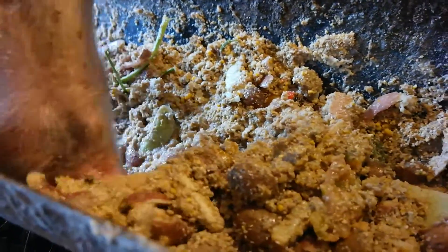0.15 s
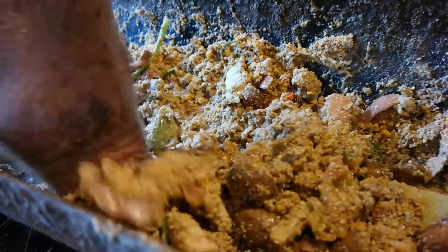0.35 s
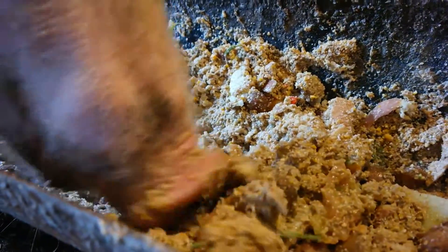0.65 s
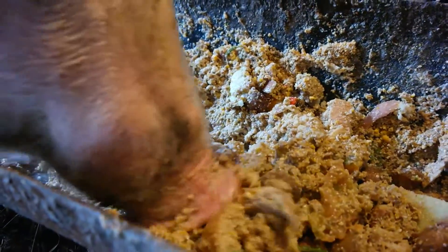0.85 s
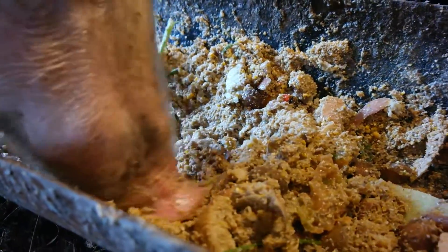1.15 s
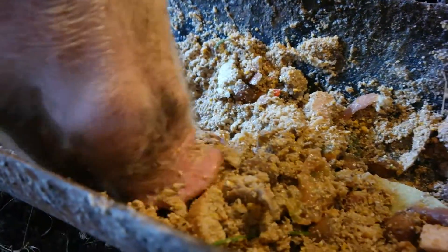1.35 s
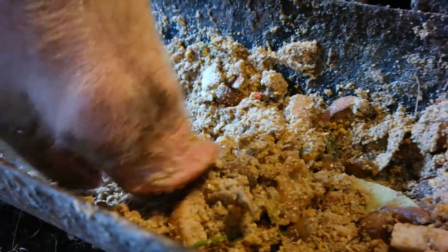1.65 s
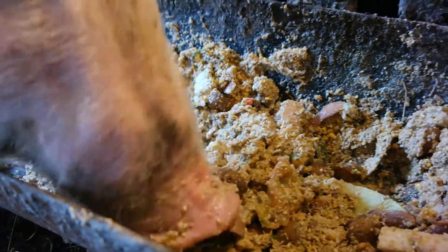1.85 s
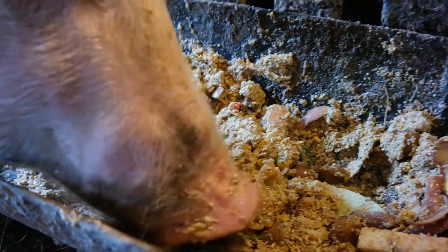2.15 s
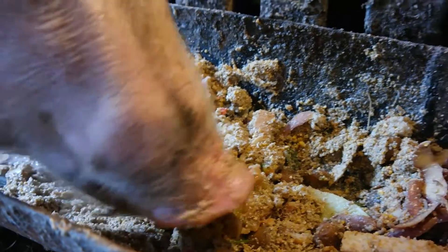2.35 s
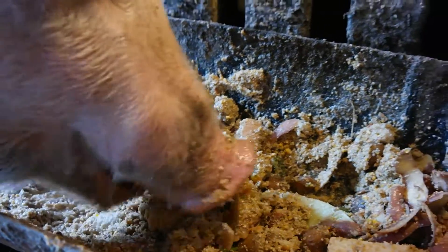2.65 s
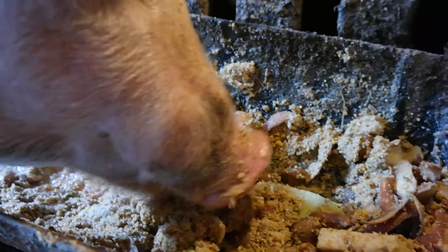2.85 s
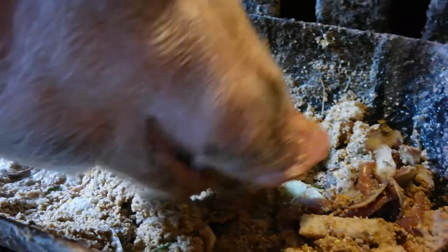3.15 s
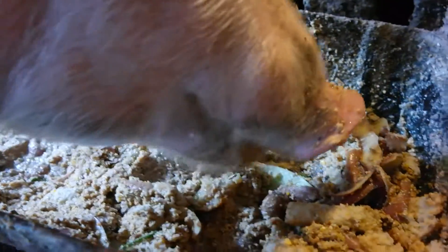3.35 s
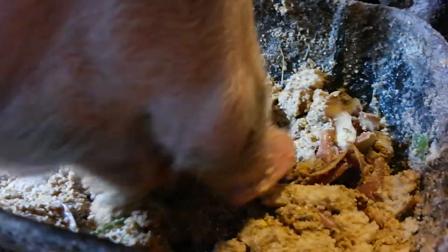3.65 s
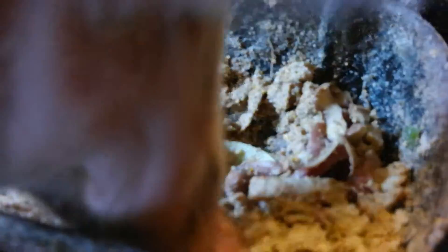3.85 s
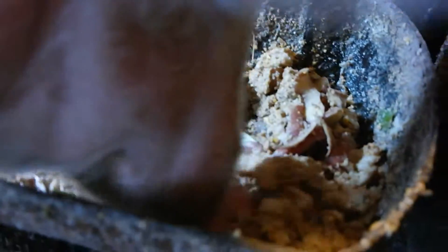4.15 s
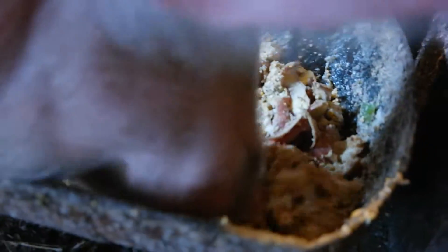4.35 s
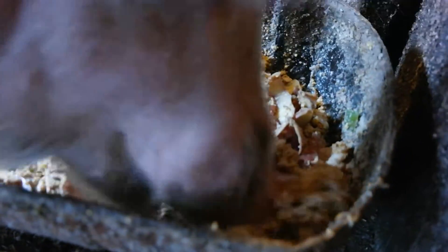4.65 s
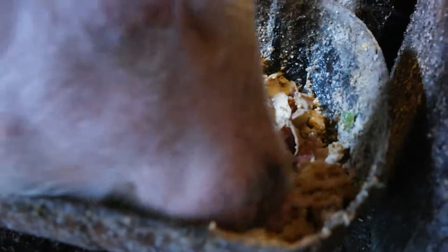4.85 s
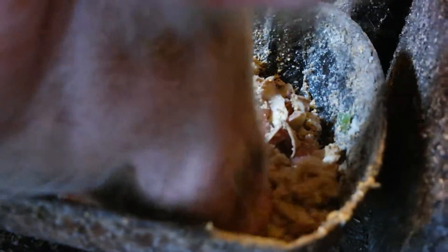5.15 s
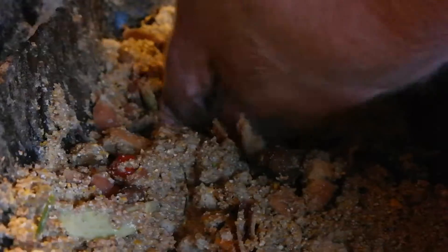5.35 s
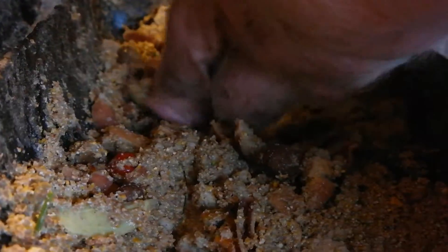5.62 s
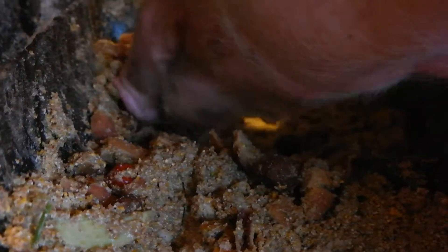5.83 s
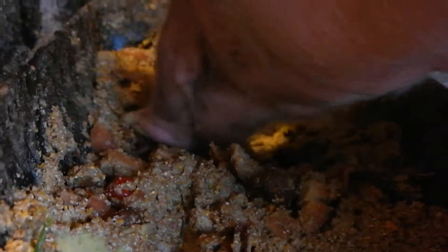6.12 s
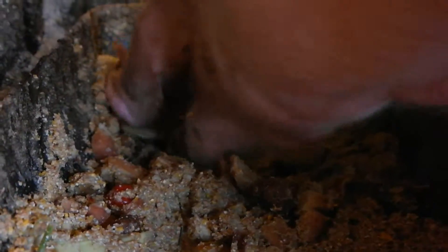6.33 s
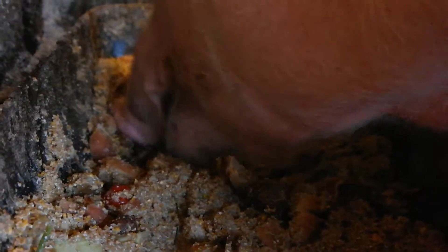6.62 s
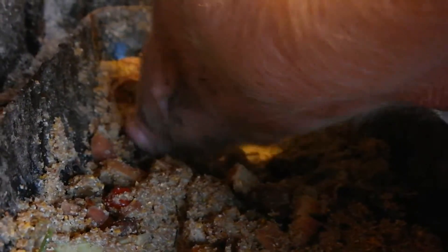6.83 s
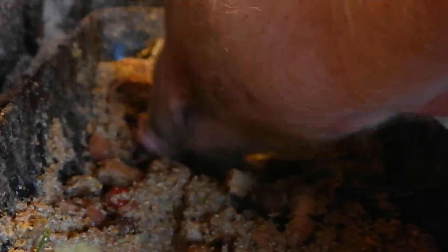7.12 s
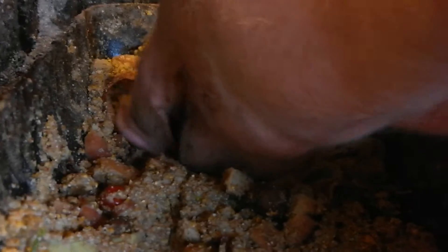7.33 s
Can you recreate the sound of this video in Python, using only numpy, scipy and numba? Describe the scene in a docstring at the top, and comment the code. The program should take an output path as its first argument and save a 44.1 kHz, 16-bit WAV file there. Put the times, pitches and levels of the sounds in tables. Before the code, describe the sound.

A pig eats wet mash very close up: constant squelching, smacking lips, popping air pockets, crust cracks and one snorting nose blow.

```python
"""A pig roots in wet mash in a trough, its snout a hand's width from a phone.
Air pockets pop as noise-struck resonances with wet tails; lips smack, crust cracks, the snout bumps.
Mash squelches as resonant noise opened by tiny bursts and by each bite, among bubbles rising in pitch.
The snout blows one long rush; low noise resonances make the grunts, the trough's hum and the yard's rumble."""
import sys
import numpy as np
from scipy import signal
from scipy.io import wavfile
from scipy.ndimage import uniform_filter1d
from numba import njit

SR = 44100
rng = np.random.default_rng(int(sys.argv[2]) if len(sys.argv) > 2 else 0)


def bounce(signal):
    """Save signal as a 16-bit WAV file at the path given by the first command-line argument."""
    frames = np.transpose(np.atleast_2d(signal))
    limited = np.clip(frames, -1, 1)
    pcm = np.round(limited * 32767).astype(np.int16)
    wavfile.write(sys.argv[1], SR, pcm)


N = 329865

# resonances of the mouth: (centre [Hz], nominal width [Hz], level [dB])
MOUTH = [(411, 140, 1), (742, 120, 1.5), (1013, 43, -6.5), (1286, 190, -3), (1549, 83, -2)]
# resonances at the lips: (centre [Hz], nominal width [Hz], level [dB])
LIPS = [(2035, 196, -6), (2940, 590, -2), (3830, 140, -13), (4450, 470, -11.5)]
BLOW_START_S, BLOW_END_S = 1.385, 1.74


def undb(db):
    """Decibels to amplitude factor."""
    return 10 ** (np.asarray(db) / 20)


def unit(x):
    """Scale to RMS 1."""
    return x / np.sqrt(np.mean(x ** 2))


def band(x, hz, width_hz):
    """One resonance, gain 1 at the centre."""
    b, a = signal.iirpeak(min(hz, 0.4 * SR), hz / min(width_hz, SR / 4), SR)
    return signal.lfilter(b, a, x)


@njit
def moving(x, g, k):
    """A steep resonance whose centre moves: each row runs twice through a state-variable band-pass."""
    y = x.copy()
    for turn in range(4):
        row, b, l = y[turn % 2], 0., 0.
        for i in range(len(g)):
            v = (b + g[i] * (row[i] - l)) / (1 + g[i] * (g[i] + k))
            b, l, row[i] = 2 * v - b, l + 2 * g[i] * v, k * v
    return y


def ports(mid_side, hz):
    """Left and right from a mid and a side sound; the microphone ports differ most in the treble."""
    # stereo width: (frequency [Hz], side minus mid [dB])
    width = [(60, -5.5), (110, -23), (200, -12.5), (380, -16), (700, -12.5), (1290, -8), (2380, -5.5),
             (4400, -0.5), (8120, -0.5), (15000, -0.5)]
    at_hz, side_db = np.transpose(width)
    side = undb(np.interp(np.log(hz), np.log(at_hz), side_db)) * mid_side[1]
    return np.array([mid_side[0] + side, mid_side[0] - side])


def walk(rate_hz):
    """Random levels 1 / rate_hz apart, never far above the mean, joined by straight lines."""
    steps = np.arange(0, N / SR * rate_hz + 1)
    levels = np.clip(rng.standard_normal(len(steps)), -2.5, 1.6)
    return np.interp(np.arange(N) * rate_hz / SR, steps, levels)


def crackle(rate_hz, spread_db, fade_s):
    """Envelope of random tiny bursts: soft start, quick fade, sizes capped."""
    when, size = rng.random((int(rate_hz * N / SR), 2)).T
    starts = np.zeros(N)
    starts[(when * N).astype(int)] = undb(np.minimum(-spread_db * np.log(1 - size), 2 * spread_db))
    bursts = signal.lfilter([1], [1, -np.exp(-1 / (fade_s * SR))], starts)
    return unit(uniform_filter1d(bursts, size=130))


def texture(modes, shared, lumpy, own_rate_hz, own_share, flicker_db, drift):
    """Noise in each wandering resonance, opened by a shared gate and its own bursts, ticked by grains."""
    grit, grit_per_s = 4.4, 220  # grain size over the hiss, scaled by lumpy; grain rate
    out = 0
    for hz, width_hz, db in modes:
        gate = shared + lumpy * own_share * crackle(own_rate_hz, 4.5, 4.8 / hz + 0.0023)
        flicker = undb(flicker_db * walk(18))
        noise = gate * flicker * rng.standard_normal((2, N))
        noise = noise * (1 + lumpy * grit * (rng.random(N) < grit_per_s / SR))
        centre = np.tan(np.pi * hz / SR * (1 + drift * walk(12)))
        ringing = unit(moving(noise, centre, 2.24 * width_hz / hz))
        out = out + undb(db) * ports(ringing, hz)
    return unit(out)


def low_texture(modes):
    """Low resonances under noise, with sparse soft bursts and little drift."""
    return texture(modes, 0.5, 0.63, own_rate_hz=5.8, own_share=0.47, flicker_db=0.5, drift=0.016)


def yard():
    """Far-off yard: one low noise resonance at a fixed faint level."""
    # rumble resonance: (centre [Hz], nominal width [Hz], level [dB])
    modes = [(48.3, 38, 6)]
    return undb(-57.5) * low_texture(modes)


def trough_hum():
    """The trough hums under the snout: one low resonance whose level follows a curve."""
    # trough resonance: (centre [Hz], nominal width [Hz], level [dB])
    modes = [(93.5, 22, 0)]
    # hum curve: (time [s], level [dB])
    curve = [(0.0, -62), (0.02, -53), (1.35, -61), (1.44, -39), (1.69, -58.5), (4.4, -60), (4.44, -36),
             (4.71, -59), (5.02, -46.5), (5.19, -61), (5.35, -35), (5.39, -53.5), (6.88, -55), (7.48, -59)]
    s, db = np.transpose(curve)
    return undb(np.interp(np.arange(N) / SR, s, db)) * low_texture(modes)


def grunts():
    """Chest resonances under noise; each grunt swells and dies away smoothly over a faint throat."""
    # chest resonances: (centre [Hz], nominal width [Hz], level [dB])
    chest = [(146.4, 31.6, -2), (222.5, 43, -1.5), (278, 230, -5.5)]
    # low grunts: (middle [s], length [s], gain added to the faint throat's [dB])
    calls = [(1.596, 0.99, -44), (2.502, 0.38, -41.5), (3.457, 0.61, -39), (7.087, 0.78, -48)]
    t = np.arange(N) / SR
    gain = np.full(N, undb(-53))  # between grunts
    for middle_s, length_s, db in calls:
        gain += undb(db) * np.exp(-(4 * (t - middle_s) / length_s) ** 2)
    return gain * low_texture(chest)


def swell(since_s, length_s, top_db, sag_db_per_s):
    """Gains of deep squelch, thin squelch and spit for one effort: it rises, sags and lets go."""
    rise_s, fall_s = 0.016, 0.056
    since_s = np.maximum(since_s, 0)
    shape = np.minimum(since_s / rise_s, 1) * np.exp(-np.maximum(since_s - length_s, 0) / fall_s)
    return shape * undb(np.array(top_db)[:, None] - np.outer(sag_db_per_s, since_s))


def jaw():
    """The loudest effort of the moment, bite or blow, sets the gains of deep squelch, thin squelch and spit."""
    # jaw closings: (start [s], length [s], deep squelch [dB], thin above deep [dB], spit above deep [dB])
    bites = [(-0.03, 0.13, -36.5, -2, -0.5), (0.166, 0.2, -40, -2.5, 1), (0.397, 0.047, -38, -8, 1),
             (0.526, 0.11, -46, -0.5, 2.5), (0.647, 0.097, -37, 1, 2), (0.78, 0.19, -43, -11, -4.5),
             (0.949, 0.21, -41.5, 0, 3.5), (1.175, 0.24, -39.5, -4, -2), (1.718, 0.15, -35.5, -6, 0.5),
             (1.916, 0.11, -46.5, -3, -13), (2.096, 0.12, -58, 11, 16), (2.349, 0.38, -42.5, 0, 3),
             (2.645, 0.28, -40, 0, 1.5), (2.976, 0.11, -41, 0, 4.5), (3.169, 0.2, -42.5, -3, 4.5),
             (3.403, 0.19, -40, -0.5, -0.5), (3.642, 0.28, -42, -1, -1.5), (3.924, 0.59, -40.5, -2, -0.5),
             (4.294, .1, -46, -1.5, -1.5), (4.404, 0.21, -44.5, -1.5, 3.5),
             (4.636, 0.34, -41.5, -3.5, -2.5), (4.95, 0.18, -50, -3, 2), (5.227, 0.12, -44, -3, -0.5),
             (5.323, 0.015, -45, -2, 13), (5.395, 0.16, -38.5, -4, -3.5), (5.656, 0.2, -44.5, 0.5, 4),
             (5.877, 0.15, -41, -6, 0), (5.967, 0.31, -40, -2.5, 3.5), (6.304, 0.19, -39.5, -0.5, 4),
             (6.522, 0.11, -41.5, -3, -2), (6.666, 0.097, -41.5, 4, 7), (6.82, 0.18, -34.5, -2.5, -4.5),
             (7.031, 0.14, -35.5, -2.5, -1), (7.23, 0.1, -45, -6, -2.5), (7.382, .2, -41.5, 2.5, 6.5)]
    # each triple: deep, thin, spit
    rest_db, sag_db_per_s = (-55, -53, -50.5), (10.5, 11, 3)
    blow_db, blow_sag_db_per_s = (-27.5, -27.5, -27), (12, 24, 46)
    t = np.arange(0, N / SR, 1 / 1000)
    blow = swell(t - BLOW_START_S, BLOW_END_S - BLOW_START_S, blow_db, blow_sag_db_per_s)
    out = np.maximum(undb(rest_db)[:, None], blow)
    dip_s, dip_half_s, dip_db = 1.59, 0.027, -4  # the rush falters once
    out = out * undb(dip_db * np.exp(-((t - dip_s) / dip_half_s) ** 2))
    for start_s, length_s, db, thin_db, spit_db in bites:
        bite = swell(t - start_s, length_s, (db, db + thin_db, db + spit_db), sag_db_per_s)
        out = np.maximum(out, bite)
    return [np.interp(np.arange(N) / SR, t, gain) for gain in out]


def bubbles(count, low_hz, high_hz, cycles):
    """Small bubbles in the mash: a few quick decaying cycles each, rising in pitch."""
    out = np.zeros((2, N + SR))
    for when, pitch, size, turn in rng.random((count, 4)):
        hz = low_hz * (high_hz / low_hz) ** pitch
        turns = np.arange(int(5 * cycles * SR / hz)) * hz / SR
        phase = 2 * np.pi * (turns * (1 + 0.039 * turns / cycles) + np.array([[0], [turn]]))
        loudness = np.maximum(1 - size, 0.1) ** -0.3
        tone = loudness * np.minimum(turns, 1) * np.exp(-turns / cycles) * np.sin(phase)
        i = int(when * N)
        out[:, i:i + len(turns)] += ports(tone, hz)
    return unit(out[:, :N])


def squelch():
    """Wet mash yields under the jaw, one burst train in mouth, lips and spit; the blow rushes through the nose."""
    # resonances of the nostrils: (centre [Hz], nominal width [Hz], level [dB])
    nose = [(427, 170, -11.5), (697, 160, -17.5), (1375, 270, -9), (1800, 350, -20.5), (2980, 260, -21)]
    # resonances of the spit: (centre [Hz], nominal width [Hz], level [dB])
    spit_modes = [(5650, 3200, 0), (9000, 4900, -0.5), (12200, 4100, -18), (14400, 5000, 3)]
    t = np.arange(N) / SR
    blowing = uniform_filter1d(1. * ((t > BLOW_START_S) & (t < BLOW_END_S)), size=700)
    lumpy = 1 - 0.65 * blowing  # the rush is more even
    bursts = 1 - 0.62 * lumpy + lumpy * 0.36 * crackle(90, 4.8, 0.0045)
    deep = texture(MOUTH, bursts, 0.49, own_rate_hz=23, own_share=0.29, flicker_db=3.5, drift=0.079)
    deep = deep + undb(-11.0) * bubbles(count=250, low_hz=382.4, high_hz=1598, cycles=5.9)
    rush = texture(nose, 0.9, 0.32, own_rate_hz=60, own_share=0.8, flicker_db=3.5, drift=0.043)
    thin = texture(LIPS, bursts, lumpy, own_rate_hz=44, own_share=0.35, flicker_db=4.0, drift=0.049)
    thin = thin + lumpy * undb(-9.0) * bubbles(count=300, low_hz=1695, high_hz=6330, cycles=16.2)
    spit = texture(spit_modes, bursts, lumpy, own_rate_hz=31, own_share=0.11, flicker_db=0.0, drift=0.0093)
    deep_gain, thin_gain, spit_gain = jaw()
    deep_or_rush = (1 - blowing) * deep + blowing * rush
    return deep_gain * deep_or_rush + thin_gain * thin + spit_gain * spit


def add(rings, splashes, s, peak_db, hz, fade_s, splash_db, tail_db, sharp, rise_s, tail_s, burst):
    """A click and a puff of noise ring a resonance; a quicker broad splash trails off in drips."""
    glide = 0.081  # pitch slides by up to about this fraction, up or down
    drip_db, drip_s = 6.5, 0.00299  # unevenness and spacing of the drips
    sing_width_hz = 170  # wet walls widen the singing tail's resonance
    t = np.arange(SR // 10) / SR
    start = (1 - np.exp(-t / rise_s)) ** 2 * (1 - t / t[-1])
    puff = start * (np.exp(-t / fade_s) + 1e-9)
    snap = start * np.exp(-t / (0.5 * fade_s))
    drips = np.interp(t / drip_s, np.arange(100), rng.standard_normal(100))
    tail = undb(tail_db + drip_db * np.minimum(drips, 0.6)) * start * np.exp(-t / tail_s)
    noise = rng.standard_normal((2, len(t)))
    side, slide = rng.uniform(-1.01, 1, size=2)
    click = np.zeros_like(noise)
    click[:, int(2 * rise_s * SR)] = burst * np.array([1, side])
    ring = band(band(puff * noise + click, hz, hz / sharp), hz, hz / sharp)
    sing_hz = np.minimum(hz * (1 + glide * slide * np.minimum(t / tail_s, 1)), 0.4 * SR)
    sing_in = 0.72 * tail * noise + 1.06 * click
    ring = ring + moving(sing_in, np.tan(np.pi * sing_hz / SR), sing_width_hz / hz + 1 / (4.8 * sharp))
    splash = band((snap + 0.5 * tail) * noise + 0.23 * click, hz, 2.15 * hz)
    i = int(s * SR)
    for out, sound, db in ((rings, ring, peak_db), (splashes, splash, peak_db + splash_db)):
        level = sound / np.abs(sound).max(axis=1, keepdims=True)
        part = undb(db) * ports(level, hz)[:, :N - i]
        out[:, i:i + part.shape[1]] += part


def bumps():
    """Snout bumps and gulps: soft, low, barely resonant thuds with no click."""
    # thuds: (time [s], ring peak [dB], centre [Hz], puff fade [s])
    rows = [(0.426, -34, 144, 0.038), (1.43, -14.5, 172, 0.0091), (1.447, -29, 214, 0.013),
            (2.365, -42, 215, 0.0078), (2.771, -34, 142, 0.0058), (2.907, -38, 94.2, 0.0042),
            (3.782, -30, 212, 0.0055), (4.164, -29.5, 216, 0.0045), (4.424, -27, 157, 0.0085),
            (4.468, -43, 101, 0.022), (4.763, -35, 146, 0.0072), (4.934, -38, 93, 0.014),
            (4.995, -37, 101, 0.0043), (5.311, -34, 168, 0.004), (5.538, -29, 248, 0.025),
            (6.449, -25, 325, 0.21), (6.836, -29, 112, 0.0049)]
    out = np.full((2, N), 1e-12)
    for row in rows:
        add(out, out, *row, -6, -14, sharp=0.8, rise_s=0.0038, tail_s=0.044, burst=0)
    return out


def cracks():
    """Hard bits of crust snap between the teeth: a very sudden start and a strong click."""
    # snaps: (time [s], splash peak [dB], centre [Hz], puff fade [s], ring above the splash [dB])
    rows = [(0.6629, -6.5, 4190, 0.0017, -7.5), (2.6051, -8, 5320, 0.0047, -11),
            (3.0739, -19, 14400, 0.003, -7), (3.1642, -8.5, 15000, 0.0045, -6),
            (3.287, -9, 13600, 0.0036, -18), (5.2979, -26, 5310, 0.0027, -6),
            (5.3571, -1, 15100, 0.0032, 4), (5.438, -16, 11400, 0.003, 1),
            (6.4537, -5.5, 14400, 0.0068, -9), (6.8406, -4.5, 15000, 0.0047, -7)]
    out = np.full((2, N), 1e-12)
    for s, db, hz, fade_s, ring_db in rows:
        add(out, out, s, db + ring_db, hz, fade_s, -ring_db, -24,
            sharp=4.0, rise_s=0.00022, tail_s=0.036, burst=5.9)
    return out


def smacks():
    """Lips and tongue peel apart: a softer start, a weak click and a bright splash."""
    # peels: (time [s], splash peak [dB], centre [Hz], puff fade [s], ring above the splash [dB])
    rows = [(0.0903, -25, 14500, 0.0016, -7), (0.3045, -31, 6640, 0.0015, 8),
            (0.4345, -12.5, 13700, 0.0015, 0), (0.779, -26, 15400, 0.0022, 3),
            (1.0103, -17.5, 7800, 0.00053, -2), (1.1255, -22.5, 5260, 0.0018, -7),
            (1.3888, -15, 7450, 0.0023, -9), (1.764, -18, 14000, 0.00072, -14),
            (1.8675, -12, 13900, 0.002, -7), (2.315, -28, 6660, 0.0013, -10),
            (2.496, -31, 6440, 0.0022, -2), (2.662, -20, 7000, 0.0015, -17),
            (2.754, -13.5, 14000, 0.0026, -4), (2.785, -15.5, 14300, 0.002, -15),
            (3.006, -27.5, 6650, 0.0013, -0.5), (3.1487, -27, 11300, 0.0018, -13),
            (3.255, -15.5, 13100, 0.0016, 0.5), (3.324, -28, 13900, 0.002, -1),
            (3.6055, -23.5, 11700, 0.0024, -4), (3.665, -24, 14700, 0.0018, -10),
            (3.7212, -30, 5600, 0.002, 3), (3.7908, -25, 15000, 0.0016, -5),
            (3.807, -21.5, 11700, 0.0027, -7), (4.7736, -27.5, 6580, 0.001, -13),
            (5.109, -32, 7200, 0.0028, -14), (5.1603, -31.5, 5270, 0.0019, -14),
            (5.316, -26, 13100, 0.0011, -10), (5.4282, -14.5, 14200, 0.0027, -5),
            (5.5467, -24.5, 9000, 0.0015, -0.5), (5.6555, -36, 11500, 0.002, 1),
            (6.02, -27, 5600, 0.0021, -1), (6.086, -18, 14000, 0.0029, -7),
            (6.3124, -23, 11300, 0.00085, -22), (6.3609, -24, 14100, 0.0038, 0),
            (6.406, -17, 5240, 0.0047, -11), (6.697, -15, 7850, 0.001, -7), (6.772, -29, 14600, 0.0025, 7),
            (7.0556, -8.5, 9400, 0.0014, -9), (7.088, -11.5, 13000, 0.0041, -13),
            (7.1284, -16.5, 5530, 0.0028, -11), (7.152, -21, 13900, 0.0035, -7)]
    out = np.full((2, N), 1e-12)
    for s, db, hz, fade_s, ring_db in rows:
        add(out, out, s, db + ring_db, hz, fade_s, -ring_db, -20,
            sharp=5.6, rise_s=0.0014, tail_s=0.025, burst=0.88)
    return out


def pops():
    """Air pockets burst and ring their cavities; the splash takes on the resonances of mouth and lips."""
    # bursts: (time [s], ring peak [dB], cavity [Hz],
    #          splash above the ring ahead of the mouth [dB], wet tail drive [dB])
    rows = [(0.023, -23, 1090, -2, -9), (0.07, -29, 1100, -11, -15), (0.206, -23.5, 780, -4, -4.5),
            (0.272, -25.5, 1190, 1, -7), (0.275, -22.5, 3700, -12, -14), (0.289, -22.5, 3680, -7, -2),
            (0.304, -21.5, 3320, 7.5, 1), (0.328, -22, 1200, 5.5, 0), (0.388, -36, 4100, 10, 6),
            (0.418, -28.5, 2100, 6, -1), (0.436, -25, 495, 5.5, 1), (0.458, -26.5, 2020, -21, 1),
            (0.558, -23.5, 2000, -28, -5), (0.591, -31, 1200, -15, -6), (0.662, -5.5, 4220, 2, -14),
            (0.743, -28, 2860, 9, 12), (0.772, -26.5, 1210, -18, 10), (0.827, -29, 955, -9, -13),
            (0.898, -23.5, 925, -16, 0), (0.918, -37.5, 2170, 9, -8), (0.966, -22, 1250, -18, 0),
            (0.98, -28, 3600, -12, -3), (1.011, -32, 2010, 16, 5), (1.042, -21, 1160, 4.5, -5),
            (1.083, -31, 790, -2, -2), (1.115, -15, 2880, -3.5, 0), (1.119, -24.5, 1230, -6, 9),
            (1.127, -15, 2300, -12, -6.5), (1.203, -28.5, 630, -15, 14), (1.243, -29, 2120, 0, -1),
            (1.275, -34, 644, -29, 2), (1.332, -24, 1253, -13, -3), (1.387, -24.5, 1360, 10, -4),
            (1.742, -24, 3100, 4, -9), (1.776, -15.5, 1195, 4.5, -7), (1.87, -24, 680, 4.5, -4.5),
            (2.004, -27, 1140, -28, -4), (2.126, -29.5, 2560, 5, -16), (2.181, -37, 2690, 12, -2.5),
            (2.218, -31, 1350, -9, -1), (2.329, -18, 2250, -4, -11), (2.454, -29, 2790, 7.5, -4.5),
            (2.509, -33.5, 1310, 13.5, 4), (2.526, -27, 4200, 10.5, -2), (2.661, -31, 1320, 12, -7),
            (2.666, -22, 3470, -1, -13), (2.714, -30, 2450, -4, 3), (2.755, -32.5, 715, 11, 5),
            (2.757, -22.5, 2880, 5.5, -3), (2.82, -31, 2720, 5, -9), (2.847, -36, 2520, 8, -4),
            (4.185, -24, 1640, -2, 3.5), (3.018, -19.5, 2200, -11, 1), (3.046, -21.5, 2900, -1.5, -8.5),
            (3.164, -19.5, 4870, 6, -14), (3.212, -25, 1990, -5, 2), (3.254, -26.5, 2170, 10, -5),
            (3.286, -31, 3130, 9, -2), (3.42, -32, 2650, 8, 2), (3.444, -32, 1630, 8, -7),
            (3.453, -28, 2000, 0, -10), (3.5, -26, 3030, -3, -7), (3.554, -23, 1860, -10, -6),
            (3.564, -29, 2620, 4, -21), (3.606, -21, 2780, -0.5, -31), (3.674, -27, 2010, -5, -14),
            (3.721, -23.5, 2880, -8, -14), (3.728, -23.5, 2600, 6, -21), (3.771, -15, 1960, -8, -12),
            (3.807, -27, 1790, 7, 4), (3.922, -24, 760, -10, -19), (3.989, -31, 2900, -2, 7),
            (4.03, -28.5, 1180, 3, 0), (4.071, -17.5, 2930, -1, -4.5), (4.11, -21, 847, 6.5, -2),
            (4.17, -23.5, 684, 8.5, -12), (4.363, -37, 2920, -9, 5), (4.434, -18, 1640, -13, 0),
            (4.435, -21, 2980, -5, -13), (4.44, -21.5, 1150, -18, -4), (4.509, -29, 3600, 2.5, 2),
            (4.531, -30, 2640, 0, -1), (4.546, -32, 2680, 6.5, 3), (4.564, -24.5, 860, -3, 1),
            (4.66, -30, 2940, -6, -5), (4.66, -32.5, 1560, -11, 7), (4.772, -28, 2800, -3, -8),
            (4.811, -17, 1850, -10, -5.5), (5.233, -30, 2700, 5, -8), (5.298, -33.5, 1560, 8, -11),
            (5.338, -33.5, 3500, 16, -14), (5.357, -26, 2020, 8, -33), (5.418, -36, 785, 9, -10),
            (5.444, -27.5, 1580, 4, -3), (5.547, -21.5, 1440, -10, -7.5), (5.695, -26.5, 1640, 9, -15),
            (5.754, -30, 3650, 5, -8), (5.888, -24, 3100, -11, -7), (5.945, -29, 690, -10, 2),
            (5.991, -26.5, 1510, -12, -8), (6.02, -20.5, 4000, -10, -12), (6.085, -29, 400, -12, 0),
            (6.126, -25, 1530, -1, -28), (6.153, -30.5, 690, 12.5, -8), (6.173, -22.5, 635, 6, -18),
            (6.236, -28.5, 3560, -12, -14), (6.249, -26.5, 2490, -8, -16), (6.278, -35, 1670, -7, -2),
            (6.325, -25, 3370, 12, 2), (6.326, -22, 404, -7, 1), (6.361, -25, 2090, -9, 2),
            (6.382, -30.5, 724, 4, -12), (6.396, -23.5, 2050, -12, -13), (6.453, -18, 2700, -8, -14),
            (6.459, -15, 676, 5, -18), (6.527, -30, 3580, -6, 3), (6.636, -25, 3680, 1, -10),
            (6.703, -28, 420, 1.5, -7), (6.713, -21.5, 710, 0, -6), (6.749, -25, 735, -16, -3),
            (6.773, -22, 2200, -2, -23), (6.817, -36.5, 2730, 15.5, 4), (6.838, -22, 700, 6.5, -8),
            (6.982, -24, 810, -11, -16), (7.039, -25, 3640, -3, -4), (7.058, -8, 3720, -2, -12),
            (7.063, -15, 3640, -2, -7), (7.065, -21.5, 1380, -10, 15), (7.074, -25, 650, -15, 0),
            (7.088, -12, 3380, 1, -19), (7.104, -27.5, 696, -15, -5), (7.25, -29, 393, -9, 15),
            (7.274, -24.5, 670, -8, -16)]
    rings, inside = np.full((2, 2, N), 1e-12)
    for s, db, hz, splash_db, tail_db in rows:
        add(rings, inside, s, db, hz, 0.003, splash_db, tail_db,
            sharp=2.53, rise_s=0.000803, tail_s=0.035, burst=4.4)
    resonant = sum(undb(db) * band(inside, hz, width_hz) for hz, width_hz, db in MOUTH + LIPS)
    return rings + 0.58 * inside + 0.52 * resonant


def scene():
    """Everything at the trough, as it reaches the two ports."""
    background = yard() + trough_hum() + grunts()
    mouthfuls = bumps() + cracks() + smacks() + pops()
    left_db = 0.54  # left over right: that port is a little nearer
    return (background + squelch() + mouthfuls) * undb([[left_db / 2], [-left_db / 2]])


def record(dry):
    """The phone dips one narrow band, rounds the loudest peaks and cuts the top."""
    dip_hz, dip_sharp, dip_share = 2370, 20, 0.43  # centre, Q, share removed
    dry = dry - dip_share * band(dry, dip_hz, dip_hz / dip_sharp)
    rounded = 0.8 * np.tanh(dry / 0.8)
    top_hz = 15760
    return signal.sosfilt(signal.ellip(12, 0.5, 95, top_hz, fs=SR, output="sos"), rounded)


dry = scene()
out = record(dry)
bounce(out)
```